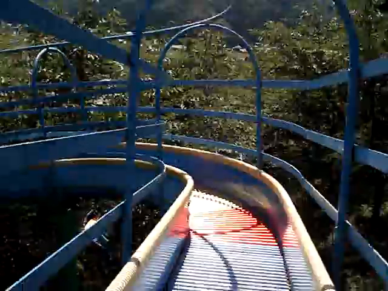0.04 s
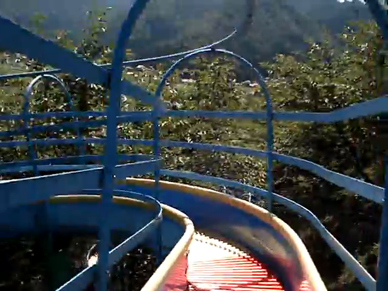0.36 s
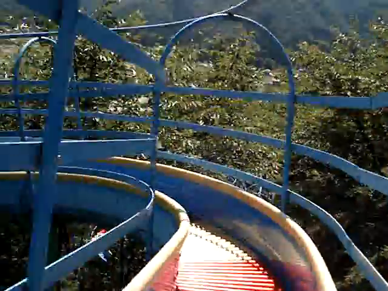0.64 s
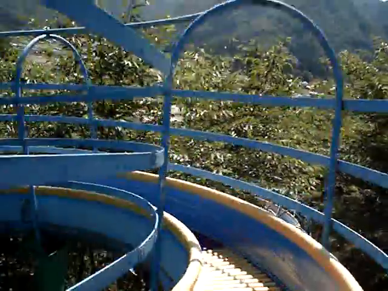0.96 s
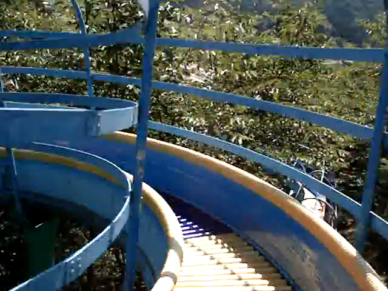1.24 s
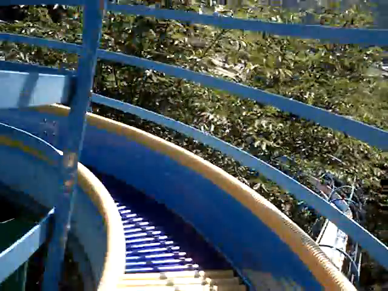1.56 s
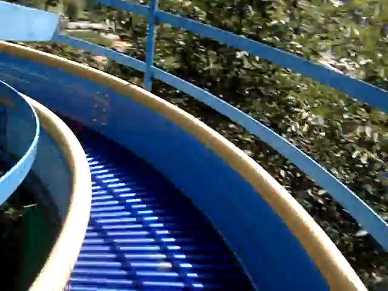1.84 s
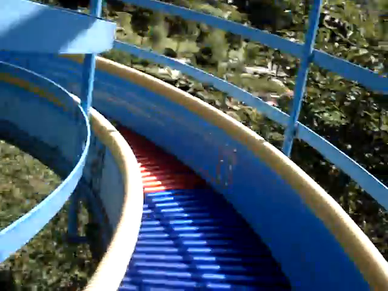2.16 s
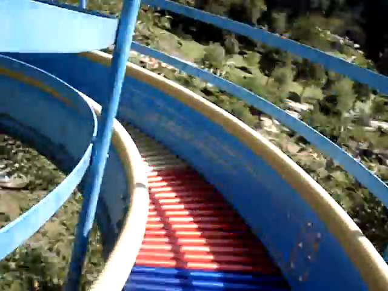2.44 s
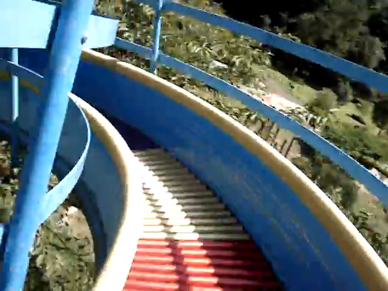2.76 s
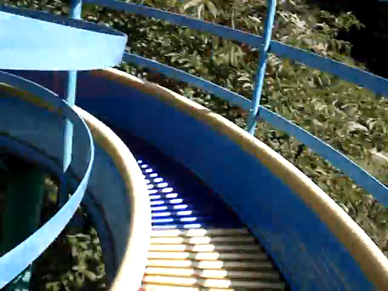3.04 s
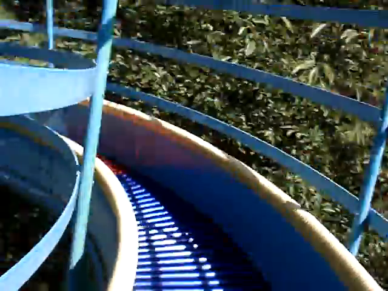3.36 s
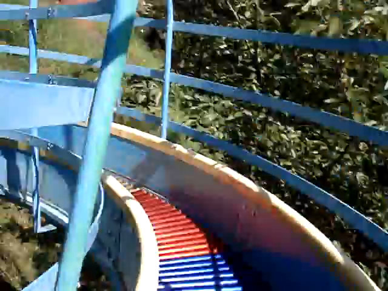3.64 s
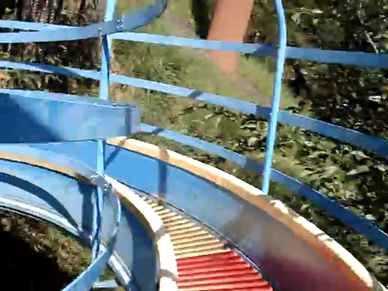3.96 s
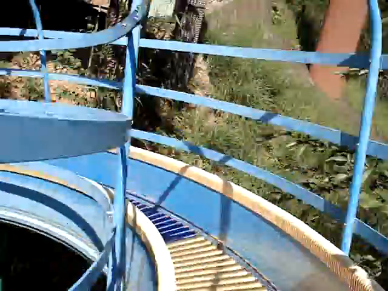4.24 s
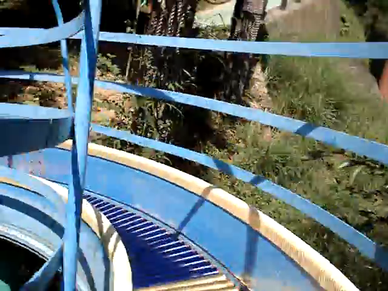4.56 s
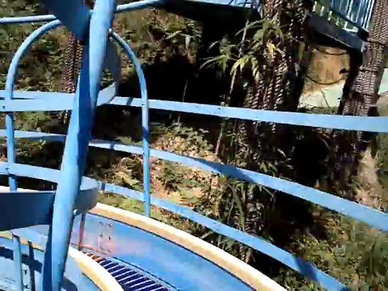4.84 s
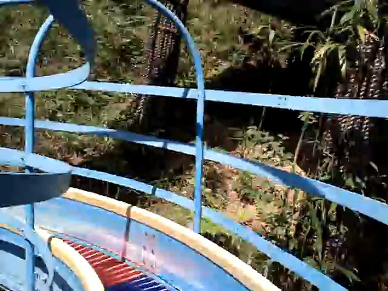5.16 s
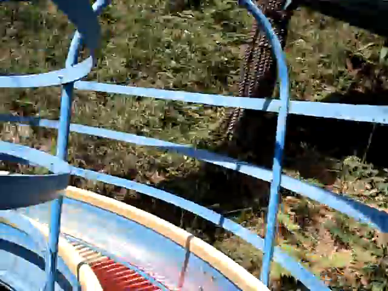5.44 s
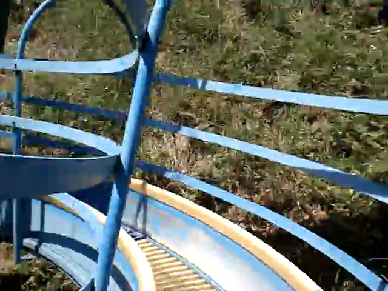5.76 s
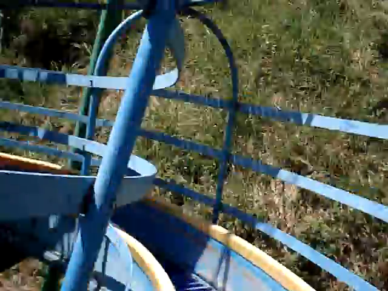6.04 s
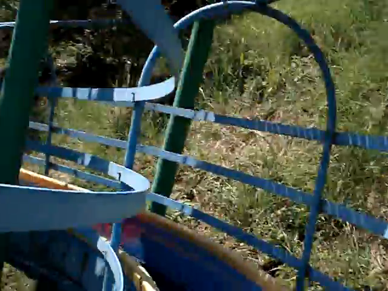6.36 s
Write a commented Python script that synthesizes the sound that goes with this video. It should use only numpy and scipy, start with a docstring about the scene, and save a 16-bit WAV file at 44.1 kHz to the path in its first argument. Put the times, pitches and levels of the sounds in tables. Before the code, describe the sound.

Heard close from a handheld microphone, the rollers of a long outdoor slide rattle and ring continuously over a hollow rumble. The clatter swells, with a brief gust of wind, then eases as rapid runs of thuds and clacks bump against the rider. Higher-pitched rollers take over midway, with scattered knocks and one small, bright metal ping toward the end.

```python
"""Ride down a roller slide

A rider coasts down a long outdoor slide, microphone in hand. Hundreds of spinning tube rollers ring
and rattle on their axles, the trough rumbles under them and wind buffets the microphone. Uneven
rollers knock against the rider, singly and in quick rows; one knock sets off a metallic ping.
About halfway down, a run of higher-pitched rollers takes over."""
import sys
import numpy as np
from scipy import signal
from scipy.fft import rfft, irfft, next_fast_len
from scipy.io import wavfile
from scipy.ndimage import uniform_filter1d

SR = 44100
rng = np.random.default_rng(int(sys.argv[2]) if len(sys.argv) > 2 else 0)


def put_to_file(sound):
    """Save the sound as 16-bit audio at rate SR, in the file named by the first command-line argument."""
    columns = np.atleast_2d(sound).T  # one column per channel
    safe = np.clip(columns, -1, 1)
    whole_steps = np.round(safe * 32767)
    wavfile.write(sys.argv[1], SR, whole_steps.astype(np.int16))


N = 282240
TIME_S = np.arange(N) / SR
TOP_END_S, TOP_BLEND_S = 1.506, 0.067  # rider leaves the slide's top section


def from_db(db):
    """Decibels to gain."""
    return 10 ** (np.asarray(db) / 20)


def unit_rms(x):
    """Scale to rms 1."""
    return x / np.sqrt(np.mean(x ** 2) + 1e-20)


def gains(rows):
    """One per-sample gain for each dB column of a time curve."""
    t_s, *columns = np.transpose(rows)
    return [from_db(np.interp(TIME_S, t_s, db)) for db in columns]


def passed(at_s, blend_s):
    """Smooth 0-1 step from one part of the slide to the next."""
    return .5 + .5 * np.tanh((TIME_S - at_s) / (2 * blend_s))


def drift(rate_hz):
    """Slow random wander, rms about 1."""
    hop, settle = 40, 2000
    r = np.exp(-2 * np.pi * hop * rate_hz / SR)
    noise = rng.standard_normal(N // hop + settle + 2)
    slow = signal.lfilter([1], [1, -2 * r, r * r], noise)[settle:]
    return np.interp(np.arange(N) / hop, np.arange(len(slow)), unit_rms(slow))


def colour(x, spectrum):
    """Minimum-phase filter along (f/Hz, level/dB) points; output rms 1."""
    size = 2 * next_fast_len(N // 2 + SR // 10)
    hz, db = np.transpose(spectrum)
    grid_hz = np.maximum(np.fft.rfftfreq(size, 1 / SR), 1)
    magnitude = from_db(np.interp(np.log(grid_hz), np.log(hz), db))
    cepstrum = irfft(np.log(magnitude))
    response = np.exp(rfft(2 * cepstrum[:size // 2], size))
    return unit_rms(irfft(rfft(x, size) * response)[:N])


def resonate(x, hz, width_hz, peak_db):
    """Two-pole resonance."""
    r = np.exp(-np.pi * width_hz / SR)
    feedback = [1, -2 * r * np.cos(2 * np.pi * hz / SR), r * r]
    return from_db(peak_db) * (1 - r * r) / 2 * signal.lfilter([1, 0, -1], feedback, x)


def contacts(per_s, spread_db):
    """Tiny impacts of random time, strength and sign."""
    sizes = from_db(spread_db * np.minimum(rng.exponential(1, N), 4))
    return (rng.random(N) < per_s / SR) * sizes * rng.choice([-1, 1], N) + 1e-18


def tubes(modes, first_db, second_db, whirr_db):
    """Rattling tubes: two clear low modes and a whirr of high ones, all growing with spin."""
    # spin, as whirr level: t/s, level/dB
    spin_curve = [(0.06, -37.5), (0.11, -35), (0.23, -32), (0.48, -31.5), (0.73, -27.5), (1.42, -24),
                  (1.72, -28.5), (1.95, -29), (2.11, -27), (2.25, -26.5), (2.48, -32.5), (2.92, -35),
                  (3.5, -36), (3.63, -33.5), (3.89, -33.5), (4.32, -36.5), (4.92, -35), (6.4, -31.5)]
    spin = gains(spin_curve)[0] / from_db(-32)  # 1 at the usual spin
    rings = []
    for hz, width_hz, db in modes:
        ring = resonate(contacts(per_s=6000, spread_db=4.0), hz, width_hz, db)
        rings.append(resonate(ring, hz, 7 * width_hz, 0))  # little radiation between modes
    below_top = passed(TOP_END_S, TOP_BLEND_S)
    first = from_db(first_db + 2.5 * below_top) * spin ** 0.53 * unit_rms(rings[0])
    second = from_db(second_db - 3 * below_top) * spin ** 0.15 * unit_rms(rings[1])
    whirr = from_db(whirr_db) * spin * unit_rms(sum(rings[2:]))
    return first + second + whirr


def rollers():
    """The rider crosses from the upper run of tubes to the higher-pitched lower run."""
    # tube modes of each run: f/Hz, width/Hz, level/dB
    upper_modes = [(2188, 56, 0), (4052, 46, 0), (4892, 80, 4), (5040, 170, -1), (5250, 170, -1),
                   (5560, 220, -5.5), (6030, 200, -9.5), (6205, 127, -1), (7070, 140, -4.5),
                   (8055, 140, -10), (8720, 150, -12), (9330, 150, -14)]
    lower_modes = [(2471, 54, 0), (4500, 130, 1.5), (4930, 980, -7.5), (5130, 220, 0.5), (5854, 250, 9),
                   (5960, 41, -7), (6650, 170, 1), (6800, 440, -15), (7660, 70, -3), (9020, 690, -15)]
    upper = tubes(upper_modes, first_db=-36.0, second_db=-35.5, whirr_db=-32.5)
    lower = tubes(lower_modes, first_db=-37.5, second_db=-37.0, whirr_db=-30.0)
    crossed = passed(at_s=2.89, blend_s=0.43)
    return np.sqrt(1 - crossed) * upper + np.sqrt(crossed) * lower


def shaken(top_spectrum, spectrum, per_s, spread_db):
    """Dense impacts through a body whose spectrum changes below the top section."""
    below_top = passed(TOP_END_S, TOP_BLEND_S)
    top = colour(contacts(per_s, spread_db), top_spectrum)
    rest = colour(contacts(per_s, spread_db), spectrum)
    return np.sqrt(1 - below_top) * top + np.sqrt(below_top) * rest


def trough_and_axles():
    """Loose axles clatter in their bearings and shake the trough; both ring lower on the top section."""
    # relative levels along the ride: t/s, rumble/dB, clatter/dB
    ride = [(0.06, -26.5, -32.5), (0.11, -28.5, -30), (0.25, -27.5, -27.5), (1.06, -27, -24),
            (1.38, -28.5, -24), (1.65, -32, -26.5), (1.84, -32, -31), (2.67, -33, -30),
            (2.92, -37.5, -34.5), (4.03, -30, -31.5), (4.74, -28.5, -32), (5.66, -29.5, -32.5),
            (6.4, -28.5, -32.5)]
    # body spectra: f/Hz, level/dB
    top_trough = [(60, -43.5), (150, -14.5), (190, -7), (235, 0.5), (290, 0.5), (360, 3), (450, -3.5),
                  (610, -8), (740, -19), (1500, -35.5)]
    trough = [(60, -55), (130, -22.5), (180, -12), (245, -3.5), (300, -2.5), (370, -3), (460, 3), (540, -3),
              (680, -9.5), (900, -27), (1500, -38.5)]
    axles = [(220, -23), (420, -2), (590, 1), (690, -0.5), (790, -1), (880, 2), (985, 5.5), (1120, -1.5),
             (1250, 1), (1400, -3.5), (1700, -3.5), (2100, -5.5), (2700, -4.5), (3200, -10), (3900, -11.5),
             (6200, -15.5), (8300, -18), (10500, -44)]
    top_axles = [(0.925 * hz, db) for hz, db in axles]
    rumble_gain, clatter_gain = gains(ride)
    rumble = from_db(0.5) * rumble_gain * shaken(top_trough, trough, per_s=1100, spread_db=2.5)
    clatter = from_db(2.0) * clatter_gain * shaken(top_axles, axles, per_s=4500, spread_db=1.5)
    return rumble + clatter


def wind():
    """The rider's own motion drives lumpy low buffeting on the microphone."""
    # relative wind strength: t/s, level/dB
    strength = [(0.06, -60), (0.18, -42), (0.39, -50), (0.5, -42.5), (1.0, -44), (1.08, -29), (1.56, -57),
                (1.67, -46.5), (2.96, -60.5), (5.09, -54), (5.8, -61), (6.4, -55)]
    # buffeting spectrum: f/Hz, level/dB
    air = [(15, -6), (30, -3), (60, 1.5), (95, 0.5), (128, 4), (165, -5.5), (300, -35.5)]
    gusts = rng.standard_normal(N) * from_db(-3.5 * drift(rate_hz=5.8))
    return from_db(1.0) * gains(strength)[0] * colour(gusts, air)


def strike(modes, pitch, chatter, band_hz):
    """A hit with brief chatter rings a body; pitch scales modes and band. Rms 1 over the first 20 ms."""
    contact_s = .009
    t_s = TIME_S[:SR // 8]
    force = chatter * rng.standard_normal(len(t_s)) * np.maximum(1 - t_s / contact_s, 0)
    force[0] -= 1
    edges_hz = np.minimum(pitch * np.array(band_hz), SR / 3)
    force = signal.sosfilt(signal.butter(2, edges_hz, "band", fs=SR, output="sos"), force)
    ring = sum(resonate(force, hz * pitch, width_hz, db) for hz, width_hz, db in modes)
    return ring / np.sqrt(np.mean(ring[:SR // 50] ** 2))


def knocks():
    """Uneven rollers hit the rider: the hollow trough thuds, the roller clacks, its axle cracks."""
    # knocks: t/s, thud/dB, clack/dB, crack/dB, clack pitch ratio
    hits = [(.080, -29, -22, -44, 0.8), (.097, -38, -21, -44, 0.71), (.186, -25, -14.5, -35, 0.87),
            (1.581, -22, -22, -24, 0.91), (1.591, -24.5, -29, -32, 1), (1.603, -21, -38, -36, 1),
            (1.621, -23, -38, -32, 1), (1.651, -18.5, -27, -37, 1), (1.669, -18.5, -31, -31.5, 0.84),
            (1.700, -20, -31, -27, 1.4), (1.719, -41, -21.5, -31, 1.75), (1.741, -19.5, -20.5, -37, 1.2),
            (1.776, -20.5, -21, -30, 0.96), (1.794, -17.5, -24, -32, 0.88), (2.015, -19, -41, -39, 1.2),
            (2.035, -23.5, -42, -39, 0.53), (2.096, -27.5, -31, -31, 1.15), (2.143, -29, -25.5, -20, 1.4),
            (2.303, -28, -29, -27.5, 0.99), (2.327, -26, -27.5, -31, 1.2), (2.452, -25.5, -32.5, -28, 1.7),
            (2.471, -25.5, -34, -30, 0.87), (2.499, -17.5, -28, -25.5, 1.1), (2.606, -38, -28, -34, 2.3),
            (2.644, -24, -34, -23.5, 0.83), (2.669, -23, -40, -25.5, 1), (2.6925, -23, -25, -37, 1.17),
            (2.719, -18.5, -19.5, -30, 1.06), (2.744, -16, -18.5, -24.5, 0.9),
            (2.771, -21, -20.5, -32, 1.38), (2.798, -23.5, -20.5, -26.5, 1), (3.082, -35, -33, -32, 1.4),
            (3.172, -25.5, -38, -34, 0.94), (3.620, -29, -25.5, -27, 1.04), (4.073, -37, -29, -37, 1.1),
            (4.146, -24.5, -41, -34, 1), (4.507, -22.5, -40, -41, 1.15), (4.600, -30, -36, -32, 1.1),
            (4.716, -24, -41, -44, 1), (4.917, -28, -24.5, -29, 0.75), (4.9368, -33, -19, -23.5, 1.23),
            (5.086, -31, -35, -32, 0.95), (5.185, -23, -31, -35, 0.69), (5.312, -29, -17.5, -31, 1.04),
            (5.323, -21, -23.5, -36, 0.96), (5.482, -32, -33, -29, 1), (5.628, -33, -36, -34, 1.3),
            (6.056, -49, -41, -29, 1.15), (6.380, -22.5, -38, -32, 0.82)]
    # modes before pitch scaling: f/Hz, width/Hz, level/dB
    trough_modes = [(358, 30, 0), (388, 26, 7), (429, 22, 13), (472, 24, 8), (445, 150, 1), (590, 30, 5),
                    (628, 34, 0)]
    roller_modes = [(820, 85, 4), (930, 85, 5), (1130, 130, -1), (1330, 150, -1), (1600, 220, -10)]
    axle_modes = [(1880, 340, 3), (2140, 84, 0), (2582, 140, 13.5), (3320, 1200, -0.5), (4480, 390, -1),
                  (5320, 690, 0.5), (7500, 2000, -22)]
    out = np.zeros(N + SR)
    for at_s, thud_db, clack_db, crack_db, pitch in hits:
        thud = from_db(thud_db) * strike(trough_modes, pitch=0.98, chatter=0.051, band_hz=(350, 1200))
        clack = from_db(clack_db) * strike(roller_modes, pitch, chatter=0.089, band_hz=(590, 2350))
        crack = from_db(crack_db) * strike(axle_modes, pitch=0.96, chatter=0.25, band_hz=(1180, 7800))
        start = int(at_s * SR)
        out[start:start + len(thud)] += thud + clack + crack
    return out[:N]


def ping():
    """A small metal part rings on after one heavy knock."""
    at_s, hz, level_db, t60_s = 5.314, 4621, -24.5, 0.2
    age_s = np.maximum(TIME_S - at_s, 0)
    return from_db(level_db - 60 * age_s / t60_s) * np.sin(2 * np.pi * hz * age_s)


def gain_control(x):
    """Loud knocks turn the gain down; it creeps back afterwards."""
    threshold_db, slope, attack_s, recover_db_per_s = -14, 0.53, 0.027, 4.5
    power = uniform_filter1d(x[0] ** 2, size=220)
    excess_db = np.maximum(10 * np.log10(np.maximum(power, 1e-12)) - threshold_db, 0)
    ramp_db = recover_db_per_s * TIME_S
    cut_db = np.maximum.accumulate(slope * excess_db + ramp_db) - ramp_db
    r = np.exp(-1 / (attack_s * SR))
    return x * from_db(-signal.lfilter([1 - r], [1, -r], cut_db))


def scene():
    """The rider's bouncing weight jolts rollers, axles and trough together; mono on two channels."""
    bounce = drift(rate_hz=28)
    ringing = from_db(0.96 * bounce) * rollers()
    rattling = from_db(0.94 * bounce) * trough_and_axles()
    return np.tile(ringing + rattling + wind() + knocks() + ping(), (2, 1))


def record(dry):
    """Gain control, quick fade-in, asymmetric soft clip, steep low-pass."""
    start_s, cutoff_hz = .043, 10050
    x = gain_control(dry) * np.clip((TIME_S - start_s) * SR / 100, 0, 1)
    ceiling = np.where(x > 0, .47, .75)
    x = x / (1 + (x / ceiling) ** 4) ** (1 / 4)
    return signal.sosfilt(signal.ellip(12, .2, 80, cutoff_hz, fs=SR, output="sos"), x)


dry = scene()
out = record(dry)
put_to_file(out)
```